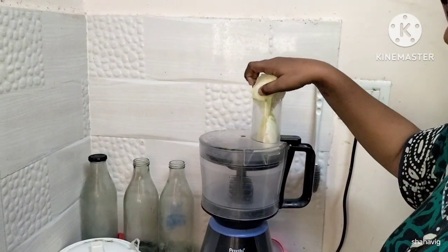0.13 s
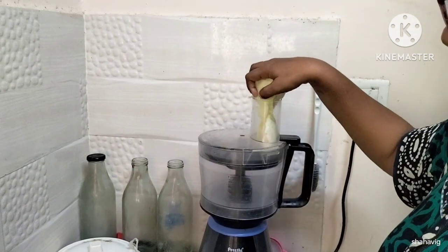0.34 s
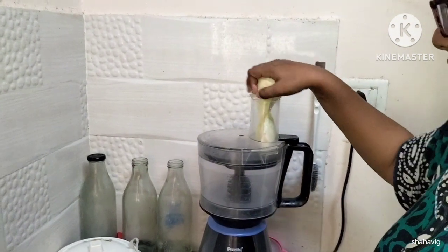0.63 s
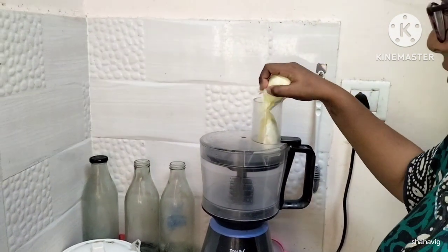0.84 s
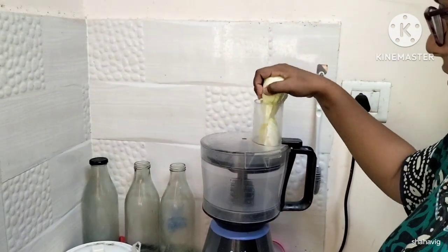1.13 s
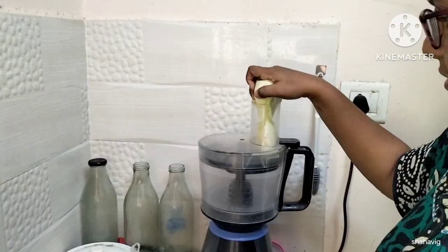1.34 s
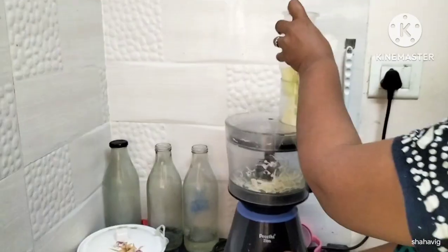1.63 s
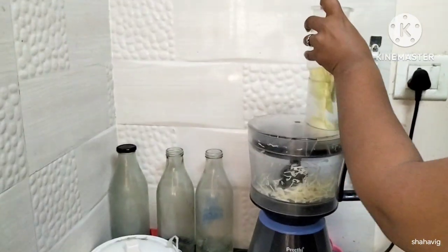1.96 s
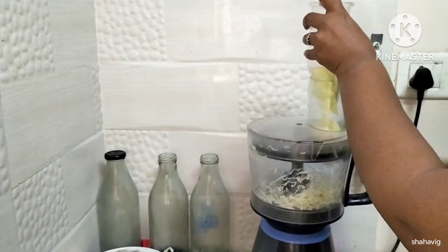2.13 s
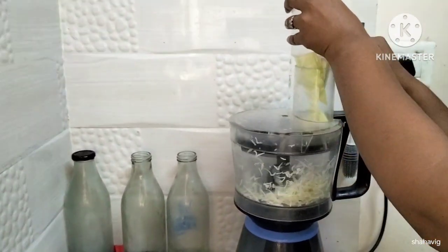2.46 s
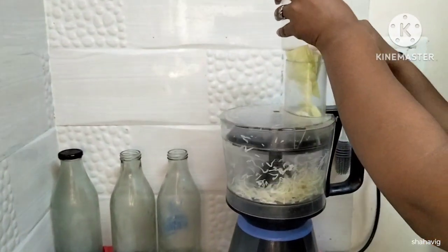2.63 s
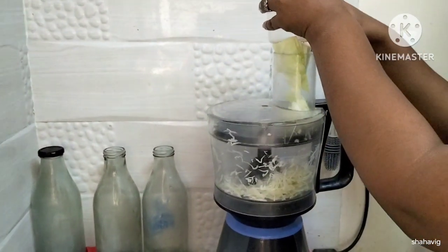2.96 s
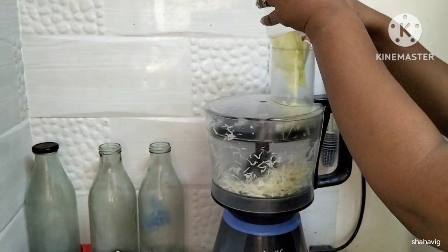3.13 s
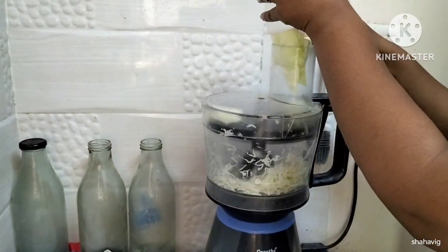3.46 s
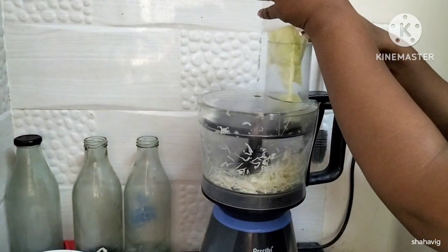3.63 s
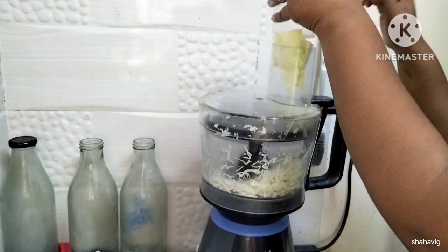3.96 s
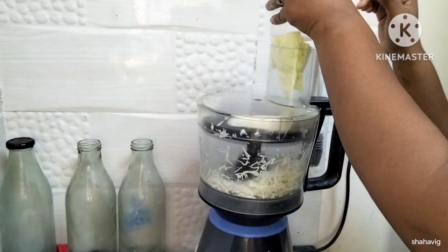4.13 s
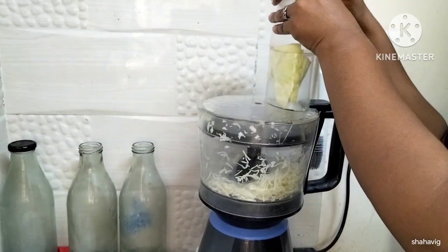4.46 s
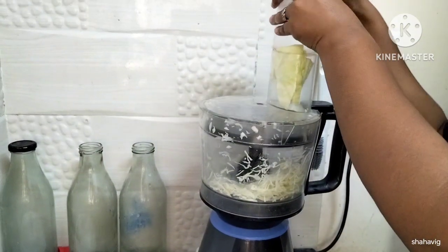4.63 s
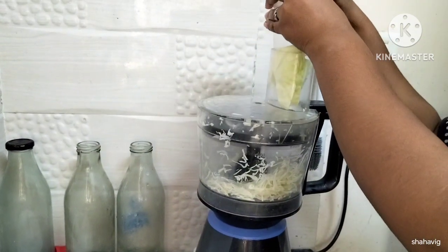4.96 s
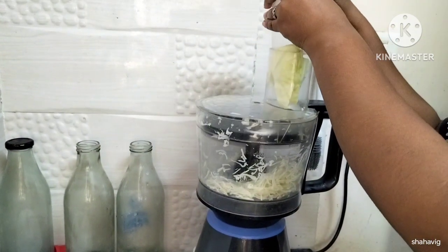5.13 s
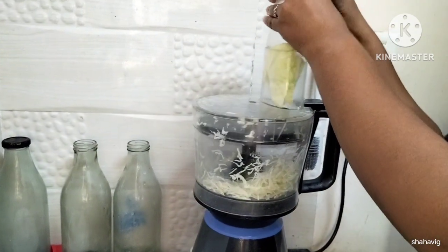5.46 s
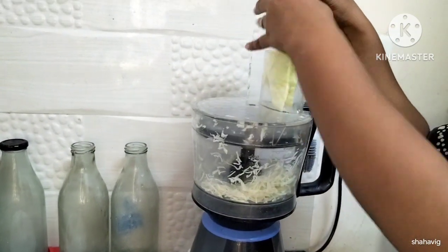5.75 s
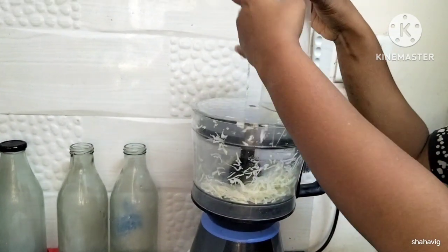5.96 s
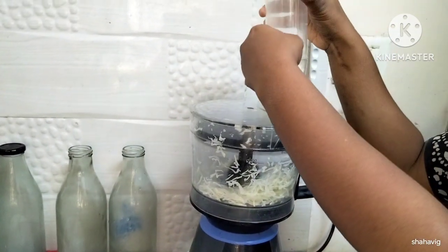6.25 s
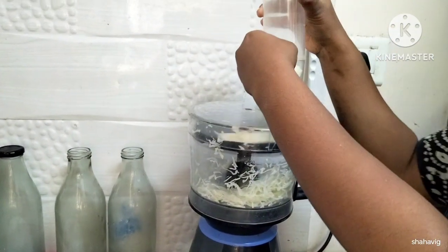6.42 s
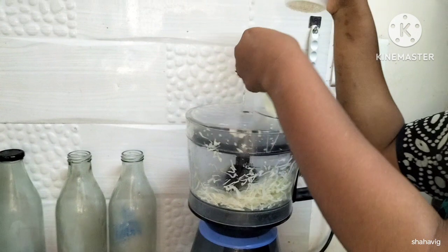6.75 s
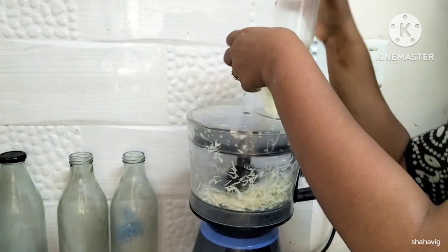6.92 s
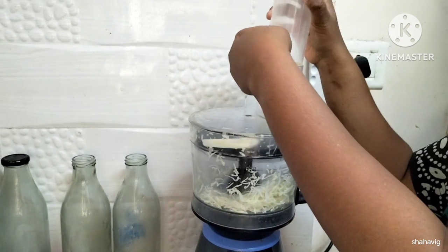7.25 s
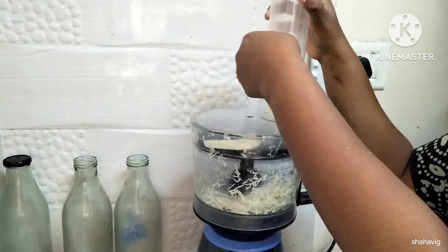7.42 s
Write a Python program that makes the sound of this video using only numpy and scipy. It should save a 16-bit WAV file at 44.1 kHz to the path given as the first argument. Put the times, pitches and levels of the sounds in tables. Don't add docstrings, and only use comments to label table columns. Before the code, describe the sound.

In a small tiled kitchen, cabbage leaves are stuffed into a plastic feed tube: faint rustles, crisp snaps, dull thuds and a brief stalk creak over low room tone. After about one and a half seconds, small ticks mark an abrupt cut to a loud running food processor, its piercing whine and harsh shredding roar continuing to the end. Mono phone microphone, dull at the top.

```python
import sys
import numpy as np
from scipy import signal
from scipy.fft import rfft, irfft
from scipy.io import wavfile

SR = 44100
rng = np.random.default_rng(int(sys.argv[2]) if len(sys.argv) > 2 else 0)


def transcribe(u):
    v = np.clip(np.atleast_2d(u).T, -1, 1)
    q = np.round(v * 32767).astype(np.int16)
    wavfile.write(sys.argv[1], SR, q)


def volts(x):
    e = np.asarray(x, float) / 20
    return 10 ** e


N = 334719
TIME = np.arange(N) / SR
HZ = np.fft.rfftfreq(N, 1 / SR) + 1e-3
CUT_S = 1.5011

KITCHEN_T60_S, KITCHEN_DB = 0.24, -5
ROOM_DB = -52
# (frequency [Hz], density [dB per Hz])
ROOM_COLOUR = [(18, -55), (30, -32), (70, -13), (88, -4), (126, -13), (315, -4.5), (858, -6), (1130, -6),
               (1910, -14.5), (3780, -15), (7000, -33), (9100, -60), (15400, -120)]

# (time [s], length [s], level [dB])
LID_SLIDES = [
    (1.283, .034, -68),
    (1.372, .04, -84),
    (1.445, .035, -85),
]
# (frequency [Hz], level [dB], T60 [s])
LID_MODES = [(1055, -10, .08), (2226, 4, .09), (2900, -2, .06), (3250, -2, .08), (3549, -1, .1),
             (3802, -2, .1), (4250, -1, .08), (4835, -1, .08), (5196, -5, .07), (6000, -3, .06),
             (6900, -8, .05), (9001, 4, .05)]

# (time [s], peak [dB])
STALK_SLIPS = [
    (0.8235, -34),
    (0.8394, -37),
    (0.8689, -41),
    (0.8859, -42),
    (0.9034, -43),
    (0.9208, -40),
    (0.9394, -41),
]
# (frequency [Hz], width [Hz], gain [dB])
STALK_PEAKS = [(2850, 90, 14), (3220, 110, 18), (3500, 90, 17), (4100, 200, 12)]
DRAG_S, DRAG_HALF_S, DRAG_DB = 0.91, 0.055, -52.5

# (frequency [Hz], width [Hz], gain [dB])
TUBE_PEAKS = [(2850, 340, 2.5), (3530, 210, 6.5), (4130, 450, 10), (4770, 210, 2), (5700, 320, 5),
              (6400, 300, 2)]
# (frequency [Hz], density [dB per Hz])
RUSTLE_SPECTRUM = [(1500, -5), (2100, -10), (2800, -1), (3500, -5.5), (4300, -3.5), (5500, -4),
                   (7000, -12.5), (10000, -3.5), (16000, 1.5)]
# (time [s], peak [dB], pitch [Hz])
LEAF_CREASES = [(0.0348, -32, 4070), (0.0847, -42, 5240), (0.1012, -35, 4700), (0.2224, -33, 4800),
                (0.2443, -31, 4400), (0.3152, -36.5, 4240), (0.4329, -47, 2820), (0.4504, -38, 4220),
                (0.4743, -40, 4400), (0.5761, -30.5, 2250), (0.6679, -35.5, 4200), (0.7307, -42, 4310)]
CREASE_T60_S = 0.065
# (time [s], rise [s], hold [s], rustle [dB], tube thud [dB])
PUSHES = [(0.036, .05, .004, -52, -70), (0.098, .045, .006, -45, -46), (.226, .015, .02, -52, -58),
          (0.271, 0.05, .058, -42.5, -42.5), (0.473, .02, .01, -50, -45), (.585, .02, .015, -67, -50),
          (.7, .14, .03, -49, -59), (.78, .05, .05, -54, -55), (0.873, .1, .06, -58, -64),
          (1.115, .005, .08, -56, -70), (1.277, 0.0056, .035, -38.5, -58), (1.353, 0.023, 0.13, -47, -54.5)]
RISE_DB, LET_GO_DB_PER_S, STILL_RUSTLE_DB, STILL_THUD_DB = 20.0, 300, -65, -54

# (time [s], speed [turns/s])
SHAFT_SPEED = [(1.5, 82.28), (1.75, 83.99), (1.95, 84.7), (2.2, 85.21), (2.7, 86.02), (3.2, 86.6),
               (3.95, 87.01), (4.75, 87.29), (5.45, 87.0), (5.9, 87.24), (6.2, 87.12), (6.65, 87.39),
               (6.95, 87.16), (7.59, 87.25)]
FULL_SPEED_HZ = 87.2

# (frequency [Hz], density [dB per Hz])
ROAR_SPECTRUM = [(30, -72), (60, -56), (120, -34), (220, -27), (350, -24.5), (650, -22.5), (950, -15.5),
                 (1250, -19), (1950, -18), (2300, -9), (3000, -8.5), (4000, -10), (6000, -16.5),
                 (16000, -13)]
# (frequency [Hz], width [Hz], gain [dB])
HOUSING_PEAKS = [(283, 38, 13), (494, 146, 4.5), (1735, 44, 5.5), (2593, 380, 7), (3290, 530, 3.5),
                 (4680, 270, 5), (5270, 440, 7), (5997, 250, 9), (6600, 120, 5)]
ROAR_DB, RUMBLE_DB, AIR_DB, AIR_LOSS_DB_PER_HZ = -20.5, -9.5, -28.5, 1.2
# (time [s], half length [s], hiss
# [dB], rumble [dB], air [dB])
ROAR_CHANGES = [
    (1.494, 0.0095, -6, -1, 31.5),
    (1.58, 0.083, -1.5, -0.5, 3.5),
    (2.002, 0.037, 1, -1, -1.5),
    (2.07, 0.028, -3, 2, 6),
    (2.222, .02, 1, 0, 0),
    (3.012, 0.6, 0.64, 1, -0.5),
    (4.542, 0.022, -1.5, 2.5, 2),
    (5.6, 0.99, -0.54, -0.5, 0.7),
    (6.205, 0.036, -4.5, 0, -1.5),
    (6.282, 0.042, -3.5, -3, 1),
]

ORDER_OF = {"rotor third": 9, "rotor fourth": 12, "lower side": 29, "mesh": 30, "upper side": 31, "rotor":
            3, "far side": 32, "second mesh": 38.58, "second mesh high": 61.72, "second mesh top": 69.43,
            "disc rattle": 16 / 3}
MAIN_LEVELS_DB = {"rotor third": (-38.5, 3.0), "rotor fourth": (-48, -2.5), "lower side": (-31, 0.1),
                  "mesh": (-26, 0.1), "upper side": (-32, 1.2), "rotor": (-45.5, 2.2),
                  "far side": (-37, 0.3), "second mesh": (-38, 4.2), "second mesh high": (-43, -0.3),
                  "second mesh top": (-41.5, 1.5), "disc rattle": (-60, .1)}
ECHO_BEATS = {"rotor third": [(1.7, .4, -5), (2.4, .24, -19)], "rotor fourth": [(1.5, .022, -14),
              (1.85, .2, 6), (3.1, .12, -10), (3.85, .55, 8), (4.8, .17, -15), (5.5, .15, 5)],
              "lower side": [(2.1, .2, 4), (2.85, .45, 7), (3.95, .35, -15), (4.7, .15, -5), (6.15, .35, 6),
              (6.85, .25, -4)], "mesh": [(1.5, .1, 4), (2.3, .11, -27), (2.75, .2, -24), (3.25, .25, -13),
              (3.9, .13, -11), (6.2, .3, 3.5)], "upper side": [(1.9, .5, -6), (2.2, .15, -5),
              (3.05, .28, -17), (6.3, .13, -10), (7.45, .42, -27)], "second mesh": [(3.9, .4, 5),
              (7.0, 1.1, -3)], "second mesh high": [(3.3, .4, 5), (4.5, .35, -6), (6.7, .5, -6)],
              "second mesh top": [(4.0, .8, 7), (6.95, .35, -9)], "disc rattle": [(3.8, .7, 13)]}
FAINT_TONE_ORDERS = (10 / 3, 11, 18, 19.29, 20.1, 22.3, 28, 46.3, 50.15, 63.43, 77.2)
FAINT_TONE_DB = (-54, -50, -52.5, -50.5, -48.5, -52, -36, -56, -39, -39, -52)
UPPER_SIDE_FLUTTER_RAD = 0.7

MIC_HZ = (20, 6650, 7100, 7600, 8100, 8600, 9500, 10000, 10600, 11200, 11850, 12500, 13500, 14100, 15500)
MIC_DB = (-2.5, 0.5, -1, -12.5, -20, -25.5, -35, -27.5, -28, -29, -17.5, -26.5, -29.5, -33, -36)
# (time [s], level [dB])
SPLICE_TICKS = [
    (1.414, -68),
    (1.4843, -60),
    (1.5013, -31),
    (1.5053, -24),
    (1.5268, -21),
]


def rms_one(x):
    return x / np.sqrt(np.mean(x ** 2) + 1e-20)


def in_time(rows):
    s, *columns = np.transpose(rows)
    return [np.interp(TIME, s, c) for c in columns]


def swell(s, half_s):
    return np.exp(-((TIME - s) / half_s) ** 2)


def drift(rate_hz):
    r = np.exp(-80 * np.pi * rate_hz / SR)
    noise = rng.standard_normal(N // 40 + 2002)
    slow = signal.lfilter([1], [1, -2 * r, r * r], noise)[2000:]
    return np.interp(np.arange(N) / 40, np.arange(len(slow)), rms_one(slow))


def grains(per_s, spread_db):
    sizes = volts(spread_db * np.minimum(rng.exponential(1, N), 5))
    sizes = sizes * rng.choice([-1, 1], N)
    return rms_one(sizes * (rng.random(N) < per_s / SR))


def ring(clicks, hz, t60_s):
    r = volts(-60 / (t60_s * SR))
    w = 2 * np.pi * hz / SR
    return signal.lfilter([0, np.sin(w)], [1, -2 * r * np.cos(w), r * r], clicks + 1e-18)


def colour(points):
    hz, db = np.transpose(points)
    return volts(np.interp(np.log(HZ), np.log(hz), db))


def resonances(peaks):
    return volts(sum(db / (1 + (2 * (HZ - hz) / width_hz) ** 2) for hz, width_hz, db in peaks))


def band(x, low_hz, high_hz, gain=1):
    low_edge = (1 + (low_hz / HZ) ** 8) ** -0.5
    high_edge = (1 + (HZ / high_hz) ** 8) ** -0.5
    return irfft(rfft(x) * gain * low_edge * high_edge, N)


def kitchen(x):
    echo = 0
    for k, lag_s in enumerate(rng.uniform(0.009, 0.034, 10)):
        loop = volts(-60 * lag_s / KITCHEN_T60_S) * np.exp(-2j * np.pi * HZ * lag_s)
        echo = echo + (-1) ** k * loop / (1 - loop)
    echo = echo / np.sqrt(np.mean(abs(echo) ** 2))
    return irfft(rfft(x) * (1 + volts(KITCHEN_DB) * echo), N)


def room_tone():
    murmur = band(rng.standard_normal(N), 20, 20000, colour(ROOM_COLOUR[:-2]))
    return volts(ROOM_DB - 0.5) * rms_one(murmur)


def lid():
    push = sum(volts(db) * ((TIME > s) & (TIME < s + length_s)) for s, length_s, db in LID_SLIDES)
    slips = grains(9000, spread_db=3.0) * push
    short = SR * 2
    rung = sum(volts(db) * ring(slips[:short], hz, t60_s) for hz, db, t60_s in LID_MODES)
    return np.pad(rung, (0, N - short))


def creak():
    push = sum(volts(db - 7.0 - 60 * np.maximum(TIME - s, 0) / 0.035) * (TIME > s) for s, db in STALK_SLIPS)
    tube = colour(RUSTLE_SPECTRUM) * resonances(TUBE_PEAKS)
    scratch = rms_one(band(rng.standard_normal(N), 2300, 20000, tube))
    drag = rms_one(band(rng.standard_normal(N), 2300, 5000, resonances(STALK_PEAKS)))
    return push * scratch + volts(DRAG_DB) * swell(DRAG_S, DRAG_HALF_S) * drag


def hand_gains():
    power = volts([[STILL_RUSTLE_DB], [STILL_THUD_DB]]) ** 2
    for s, rise_s, hold_s, *db in PUSHES:
        rise_loss_db = RISE_DB * np.maximum(s - TIME, 0) / rise_s
        release_loss_db = LET_GO_DB_PER_S * np.maximum(TIME - s - hold_s, 0)
        loss_db = np.minimum(rise_loss_db + release_loss_db, 100)
        power = power + volts(np.subtract.outer(db, loss_db)) ** 2
    return np.sqrt(power)


def leaves():
    rustle, thud = hand_gains()
    tube = colour(RUSTLE_SPECTRUM) * resonances(TUBE_PEAKS)
    crackle = rms_one(band(kitchen(grains(4000, spread_db=2.8)), 1300, 20000, tube))
    out = rustle * volts(1.1 * drift(30.0)) * crackle
    out += thud * volts(-4.5) * rms_one(band(rng.standard_normal(N), 275, 280))
    length = 4410
    decay = volts(-60 * TIME[:length] / CREASE_T60_S)
    for s, db, hz in LEAF_CREASES:
        puff = rng.standard_normal(length) * decay
        at = round(s * SR)
        out[at:at + length] += volts(db - 27.5) * ring(puff, hz, 0.024)
        out[at + 1] += volts(db - 8)
    return out


def below_full_speed():
    return FULL_SPEED_HZ - in_time(SHAFT_SPEED)[0]


def roar_levels():
    hiss, rumble, air = sum(np.outer(change, swell(s, half_s)) for s, half_s, *change in ROAR_CHANGES)
    air_db = AIR_DB - AIR_LOSS_DB_PER_HZ * below_full_speed() + air
    return ROAR_DB + hiss, RUMBLE_DB + rumble, air_db


def ridges(turns):
    out = 0
    for order in np.linspace(33, 78, 24) + rng.uniform(-0.9, 0.9, 24):
        angle = 2 * np.pi * order * turns
        rough = drift(36.0) * np.sin(angle) + drift(36.0) * np.cos(angle)
        out = out + volts(3.6 * np.clip(drift(0.9), -3, 1.5)) * rough
    return volts(roar_levels()[0] - 22.0) * out


def roar(turns):
    hiss_db, rumble_db, air_db = roar_levels()
    shape = colour(ROAR_SPECTRUM) * resonances(HOUSING_PEAKS)
    disc = np.sin(2 * np.pi * turns / 3)
    rotor = np.sin(6 * np.pi * turns)
    grit = [kitchen(grains(12000, spread_db=2.5)) for _ in range(2)]
    edges_hz = 30 * 2 ** np.arange(0, 9.6, 0.5)
    together, out = drift(5.0), 0
    for k, (low_hz, high_hz) in enumerate(zip(edges_hz, edges_hz[1:])):
        part_db = 0
        if high_hz < 2100:
            part_db = rumble_db + 14.0 + 0.87 * rotor
        elif low_hz > 7000:
            part_db = air_db + 31.0
        patch_db = 0.5 * together + 0.78 * drift(0.33) + 1.33 * drift(25.0) + 0.62 * disc
        out = out + volts(part_db + patch_db) * band(grit[k % 2], low_hz, high_hz, shape)
    return volts(hiss_db + 3.0) * rms_one(out)


def tone_levels():
    lack_hz = below_full_speed()
    levels = []
    for name, (db, loss_db_per_hz) in MAIN_LEVELS_DB.items():
        beat_db = sum(change_db * swell(s, half_s) for s, half_s, change_db in ECHO_BEATS.get(name, []))
        levels.append(db - loss_db_per_hz * lack_hz + beat_db)
    return levels


def whine(turns):
    levels_db = tone_levels() + list(FAINT_TONE_DB)
    orders = tuple(ORDER_OF.values()) + tuple(FAINT_TONE_ORDERS)
    backlash_turns = 0.0023 * drift(6.7)
    flutter = drift(27.0)
    out = 0
    for order, db in zip(orders, levels_db):
        angle = 2 * np.pi * (order * (turns + backlash_turns) + 0.08 * drift(2.4))
        if order > 30:
            angle += np.pi
        if order == 31:
            angle += UPPER_SIDE_FLUTTER_RAD * flutter
        out = out + np.sqrt(2) * volts(db + 0.52 * drift(13.0)) * np.sin(angle)
    return out


def scene():
    turns = np.cumsum(in_time(SHAFT_SPEED)[0]) / SR
    handling = room_tone() + lid() + leaves()
    machine = ridges(turns) + roar(turns) + whine(turns)
    mono = np.where(TIME < CUT_S, handling, machine) + creak()
    return np.array([mono, mono])


def roll_off(x):
    return signal.sosfilt(signal.butter(12, 15500, fs=SR, output="sos"), x)


def record(dry):
    bass_loss = np.sqrt(1 + (48 / HZ) ** 4)
    gain = colour(list(zip(MIC_HZ, MIC_DB))) / bass_loss
    heard = 0
    for shot in (TIME < CUT_S, TIME >= CUT_S):
        heard = heard + shot * irfft(rfft(dry * shot) * gain, N)
    for s, db in SPLICE_TICKS:
        heard[:, round(s * SR)] += volts(db)
    return roll_off(heard)


dry = scene()
out = record(dry)
transcribe(out)
```